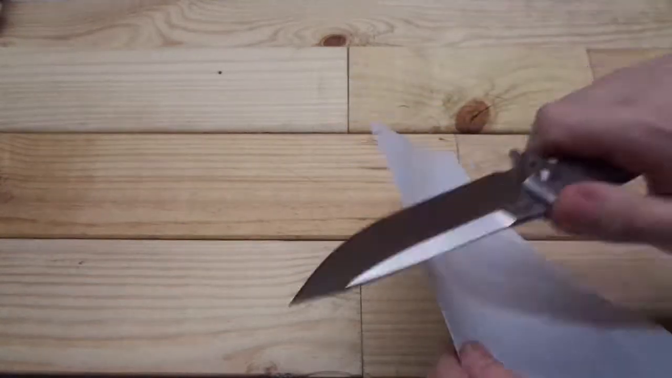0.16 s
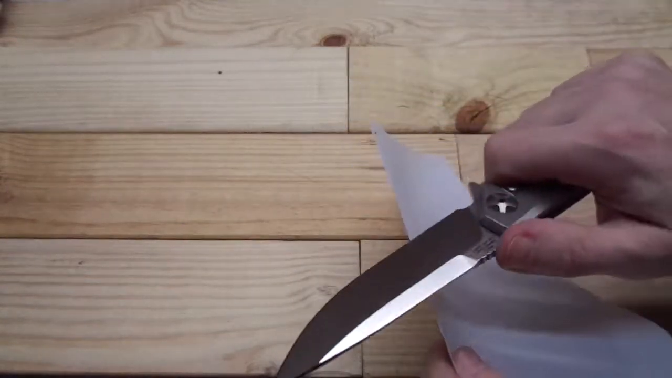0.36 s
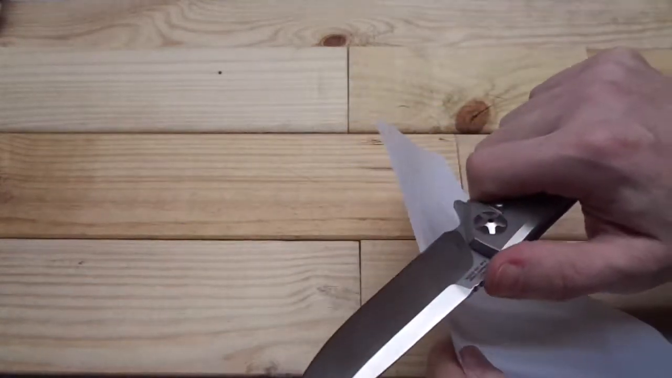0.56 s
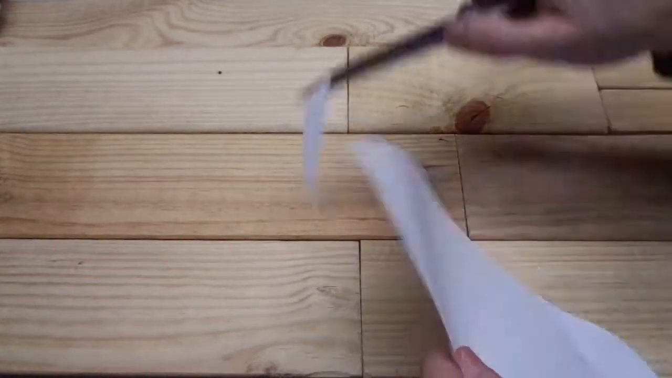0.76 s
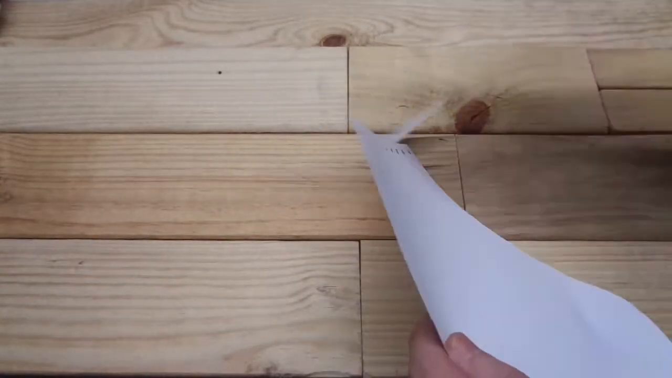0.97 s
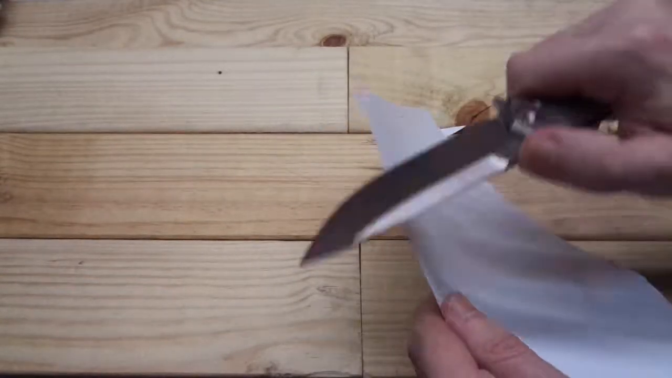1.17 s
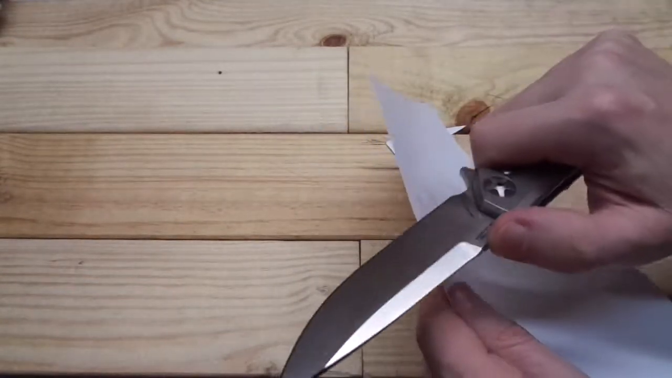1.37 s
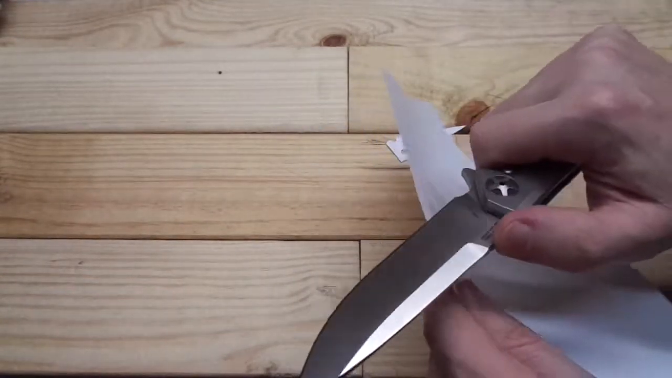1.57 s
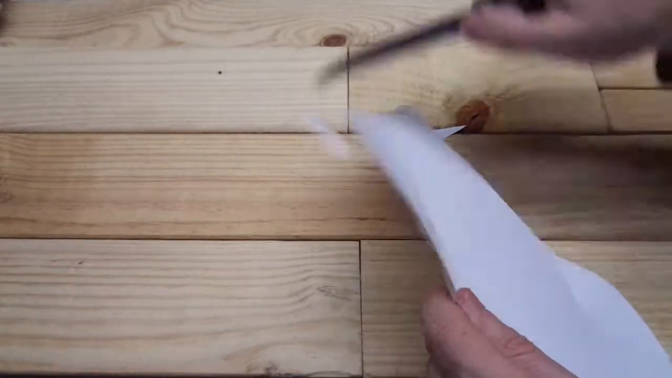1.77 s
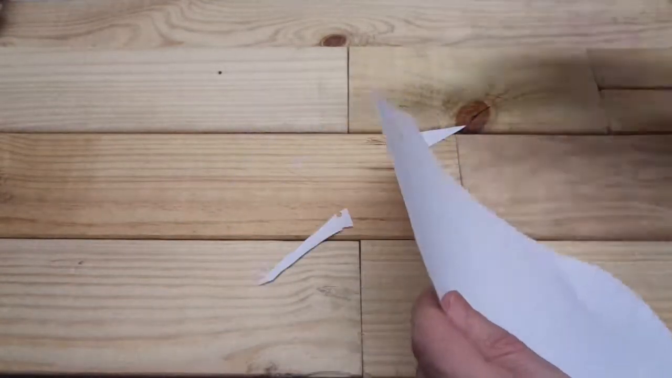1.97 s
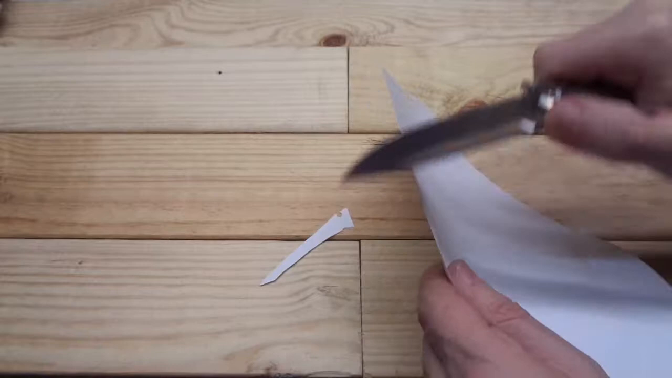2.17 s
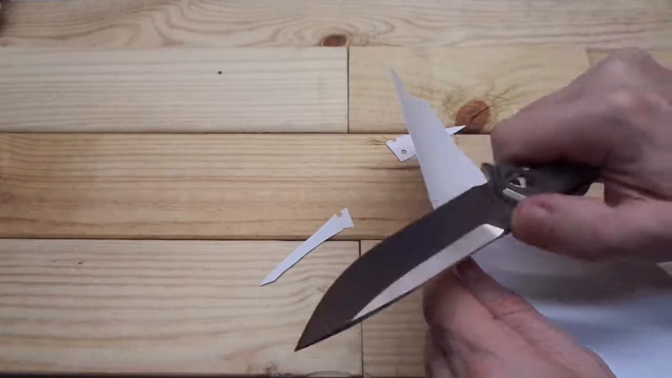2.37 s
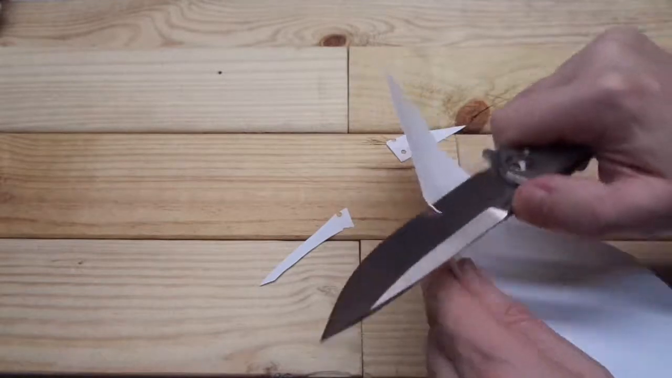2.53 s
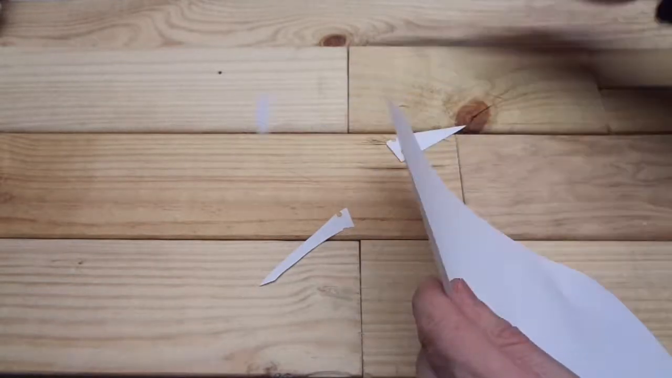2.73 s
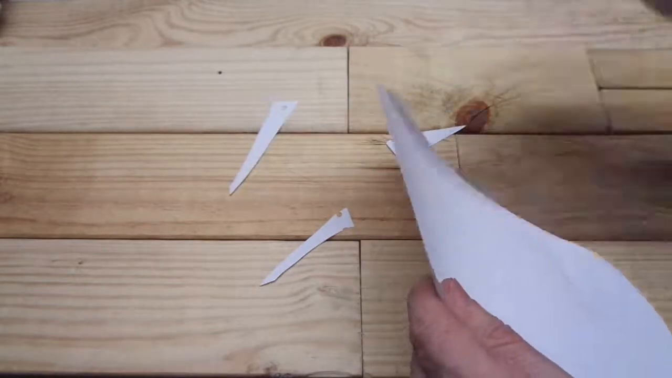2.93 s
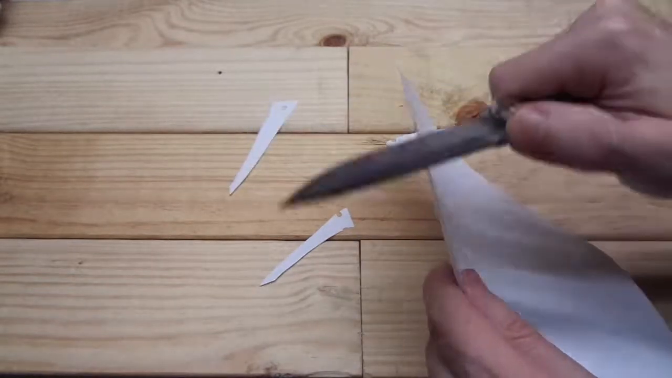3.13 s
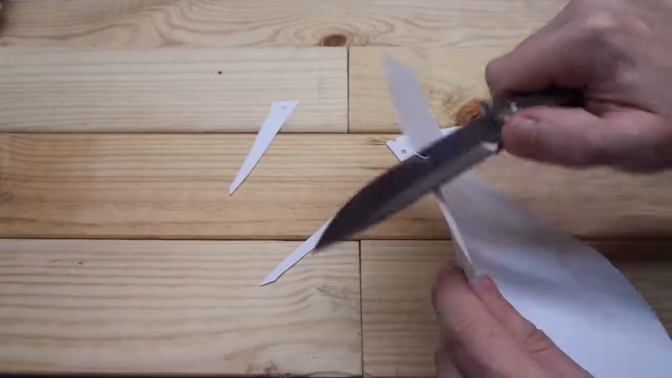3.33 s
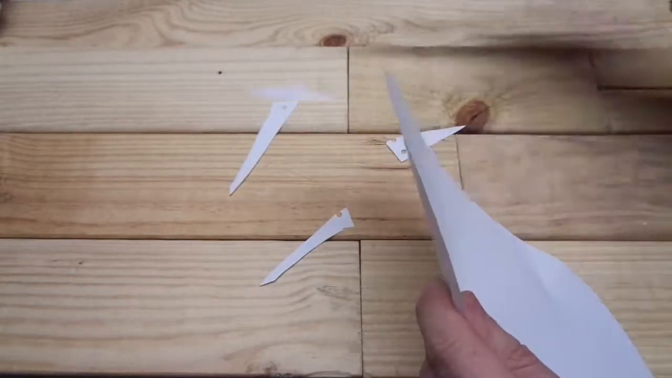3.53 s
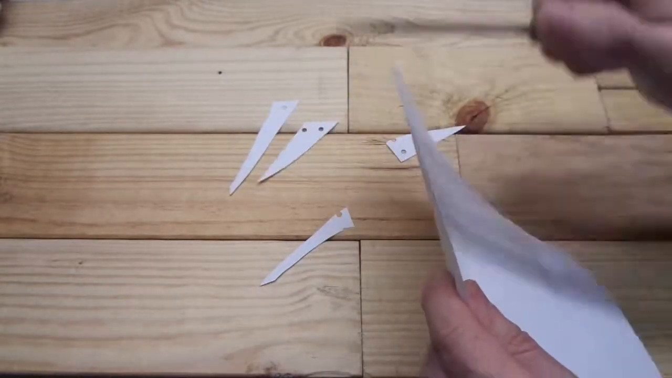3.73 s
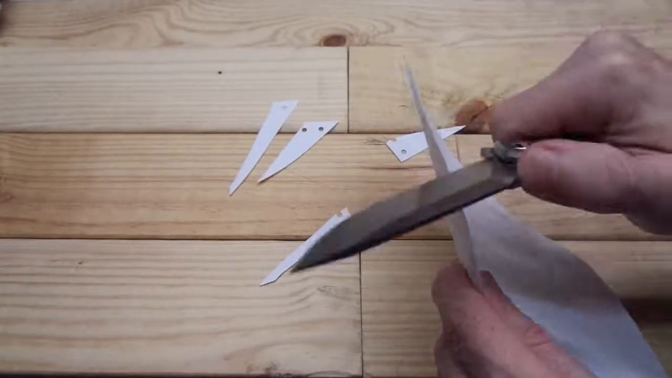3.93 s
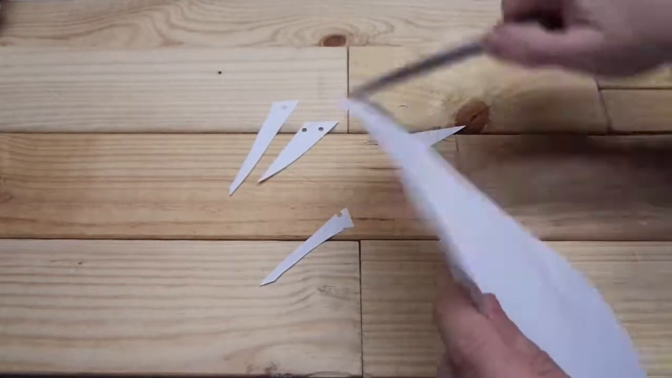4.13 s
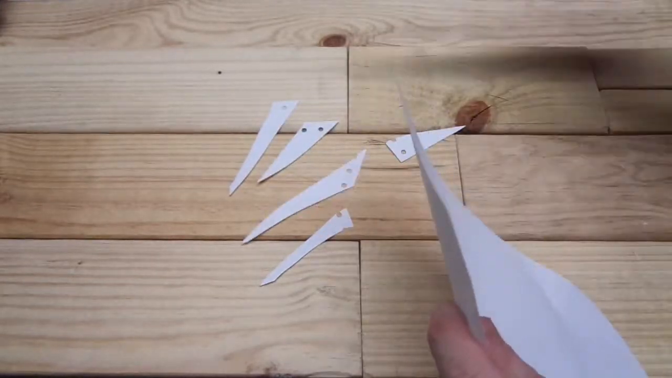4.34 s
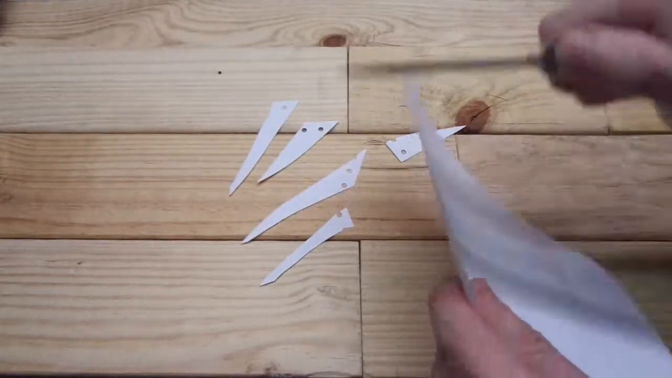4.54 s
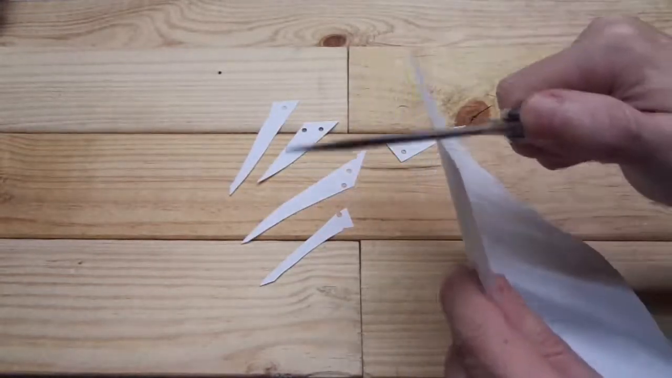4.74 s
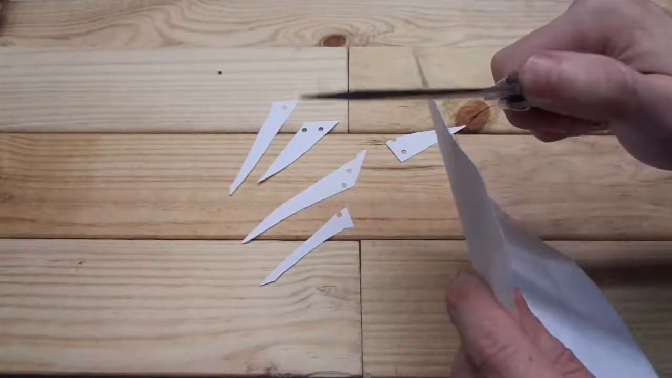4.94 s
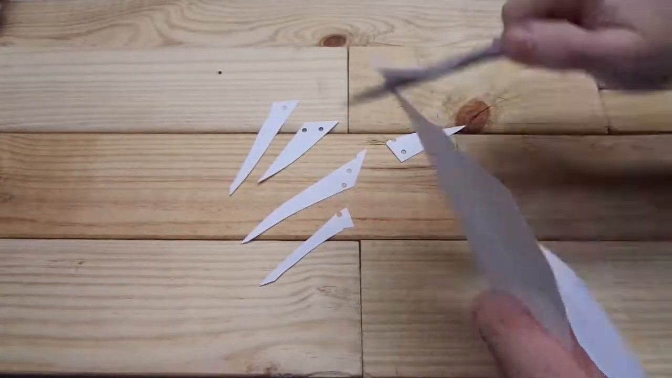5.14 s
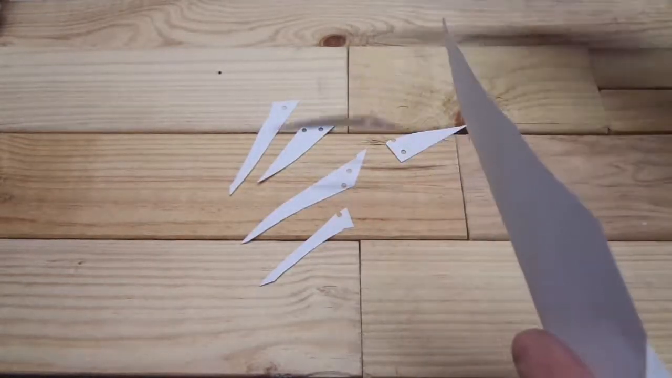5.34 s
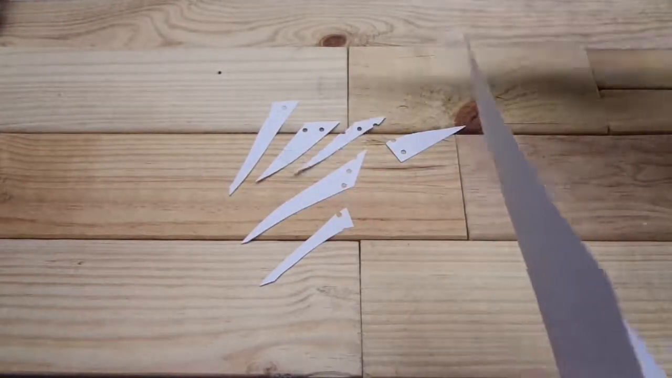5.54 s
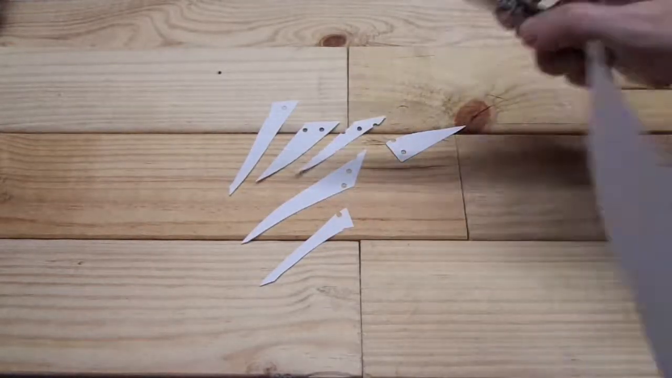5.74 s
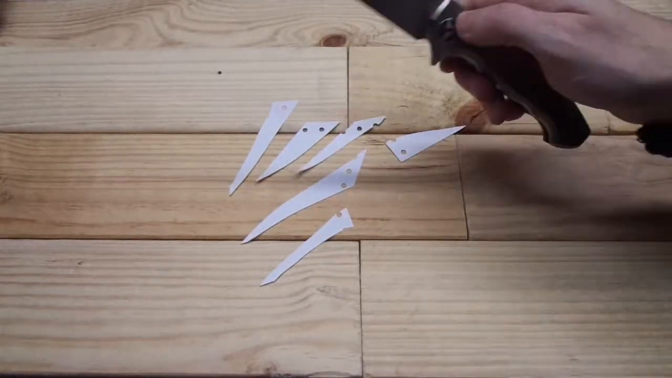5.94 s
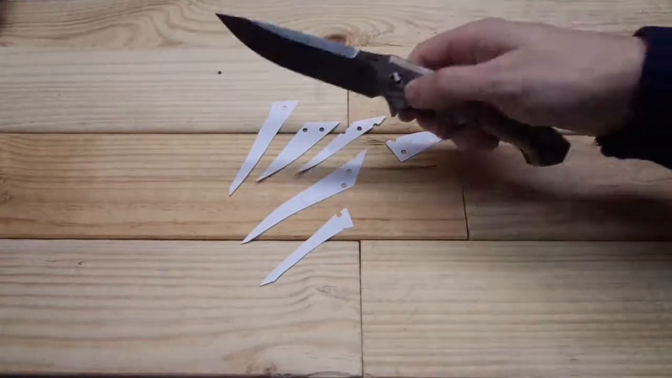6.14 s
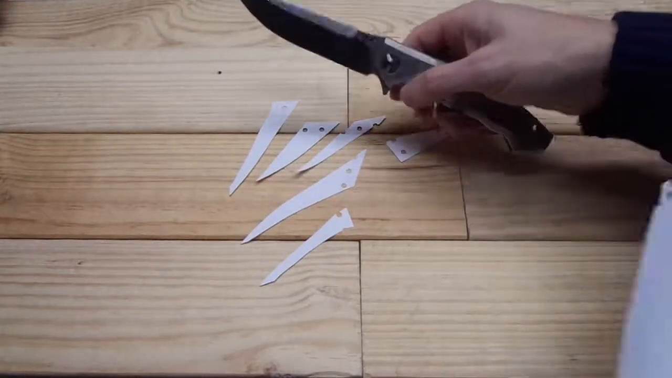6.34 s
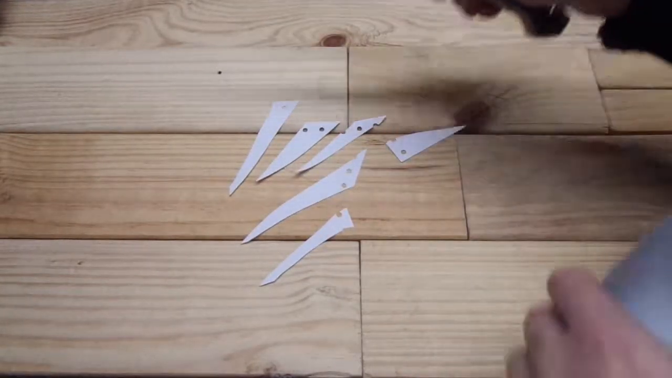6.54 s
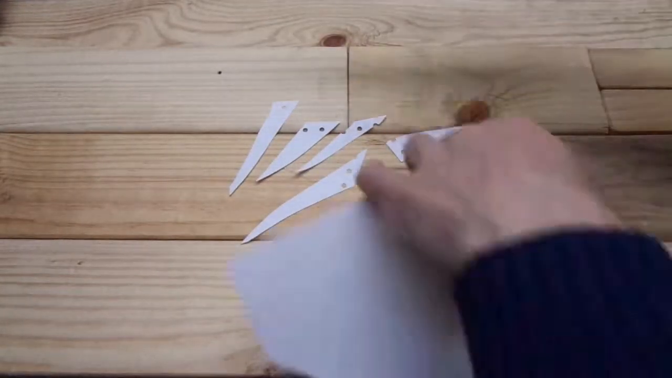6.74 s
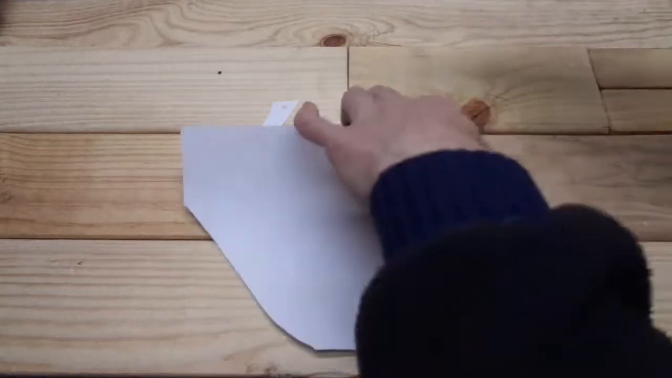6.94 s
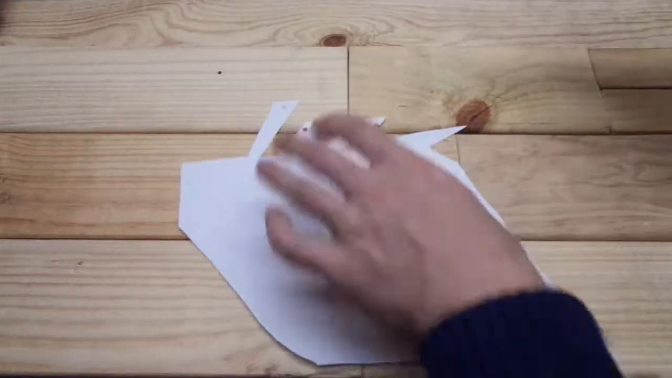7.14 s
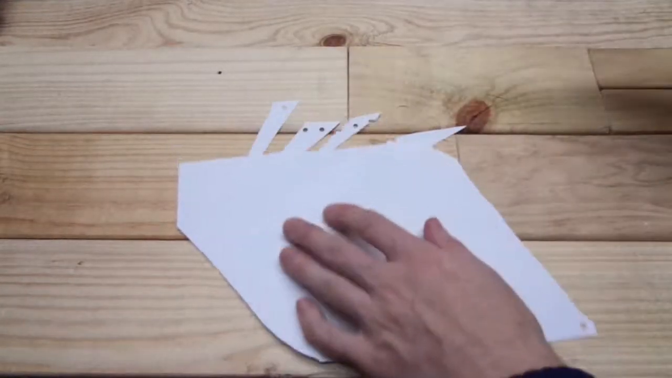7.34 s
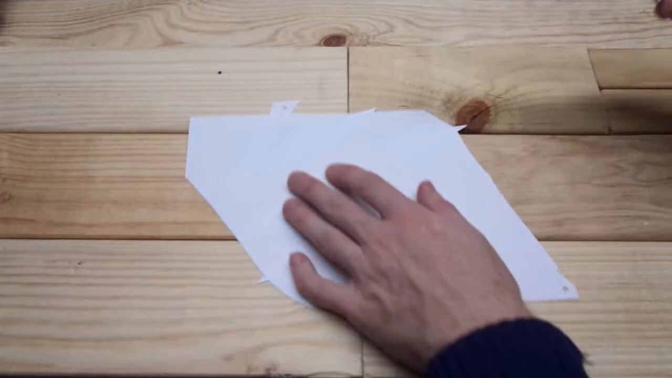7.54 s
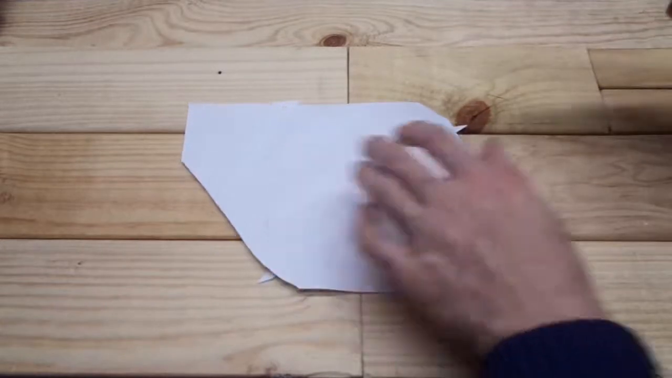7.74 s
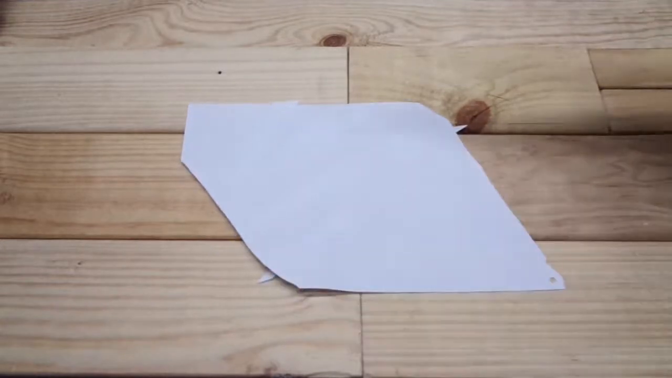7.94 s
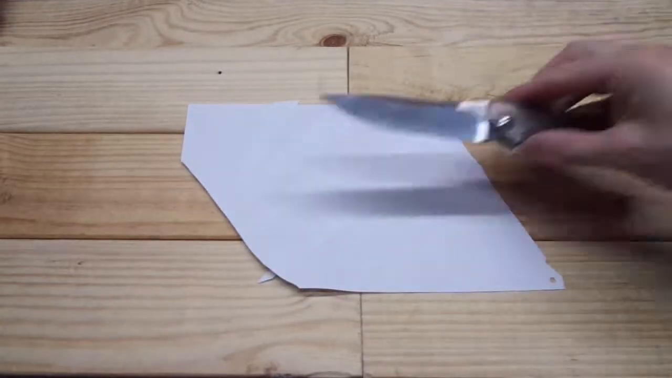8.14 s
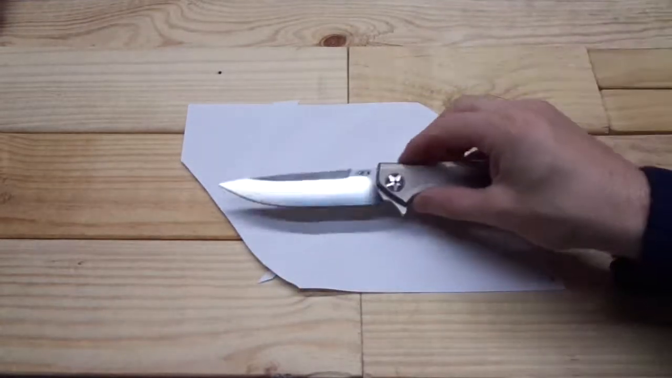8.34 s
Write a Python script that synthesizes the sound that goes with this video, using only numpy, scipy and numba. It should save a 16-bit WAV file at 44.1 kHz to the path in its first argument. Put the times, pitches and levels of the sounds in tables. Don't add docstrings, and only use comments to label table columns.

```python
import sys
import numpy as np
from scipy import signal
from scipy.fft import rfft, irfft
from scipy.io import wavfile
from scipy.ndimage import uniform_filter1d
from numba import njit

SR = 44100
rng = np.random.default_rng(int(sys.argv[2]) if len(sys.argv) > 2 else 0)


def invert_db(level):
    return 10 ** (np.asarray(level, dtype=float) / 20)


def transcribe(u):
    v = np.clip(np.atleast_2d(u).T, -1, 1)
    q = np.round(v * 32767).astype(np.int16)
    wavfile.write(sys.argv[1], SR, q)


N = 370440

# f/Hz, density/dB per Hz
HISS_SPECTRUM = [(12, -37), (20, -5), (32, -34), (54, -8), (298, -5.5), (491, -3.5), (580, -5), (931, -5),
                 (1160, -10.5), (1340, -7), (1720, -7), (1870, -10), (5230, -17.5), (14200, -18.5),
                 (15500, -17)]
# f/Hz, width/Hz, rms/dB
FAN_TONES = [(1170, 110, -59.5), (1757, 43, -75.5), (290, 24, -74.5)]
# t/s, rise/s, fall/s, peak/dB
CREAKS = [
    (2.11, 0.056, 0.11, -50),
    (7.785, 0.026, 0.11, -43),
]
# f/Hz, width/Hz, level/dB
BOARD_MODES = [
    [(500, 33, 2), (640, 36, 4), (990, 29, 8), (1090, 23, 0), (1560, 30, -8), (2060, 33, -13),
     (3530, 73, -28), (7130, 34, -15), (8300, 30, -11), (8610, 46, -17)],
    [(540, 110, -0.5), (854, 30, 5), (1370, 17, -2), (1590, 45, -0.5), (2200, 31, -5), (2570, 18, -20),
     (2570, 38, -26), (4340, 39, -30)],
]
# t/s, peak/dB, f/Hz
THUDS = [(0.735, -44, 110), (4.15, -47, 120), (1.84, -53, 131), (0.739, -35, 364), (1.815, -35.5, 396),
         (1.936, -42, 365), (2.714, -37, 315), (3.528, -42.5, 268), (4.159, -35, 333), (4.264, -44, 480),
         (5.249, -51, 302), (6.08, -46, 473), (6.317, -40, 313), (6.442, -44.5, 252), (7.594, -45.5, 374),
         (7.797, -41, 474)]

# t/s, peak/dB, ring f/Hz, presence/dB, T60/s
FLAPS = [(0.746, -27, 1570, -23, 0.12), (0.759, -14.5, 1430, -1, 0.079), (0.789, -21.5, 1140, -23, 0.11),
         (1.782, -19, 1300, -2, 0.049), (1.879, -26, 1100, -9, 0.06), (1.943, -27, 1060, -22, 0.05),
         (1.968, -34.5, 1090, -2.5, 0.092), (2.763, -39, 1270, -18, 0.08), (3.384, -19.5, 1240, -20, 0.11),
         (3.454, -18, 3260, -12, 0.028), (3.496, -27, 960, -8, 0.27), (3.528, -24, 1290, -19, 0.058),
         (5.176, -13, 890, 0, 0.069), (5.181, -21, 2270, -1, 0.06), (5.217, -27, 1540, -4, 0.2),
         (6.6, -34.5, 1230, -2, 0.44)]
# t/s, peak/dB, ring f/Hz, presence/dB
TAPS = [(0.12, -23.5, 1310, -20), (1.625, -35, 1500, -8), (5.043, -34.5, 1290, -12),
        (1.076, -35.5, 940, -6), (1.114, -30.5, 990, -16), (1.174, -41.5, 1230, -3),
        (1.574, -43, 1560, -18), (2.457, -39, 1760, -7), (4.572, -38.5, 990, -22), (4.588, -29.5, 860, -26),
        (4.869, -31, 904, -32), (6.079, -40, 890, -14), (6.082, -24.5, 820, -19), (6.523, -36, 1490, -21),
        (6.569, -37.5, 1500, -21), (6.883, -32.5, 2400, -20), (6.983, -30, 1500, -10),
        (7.312, -39.5, 1140, -28)]
# t/s, peak/dB, ring f/Hz, presence/dB, treble/dB
TICKS = [(0.603, -39, 1310, -6, -15), (0.626, -40, 1550, -5, -15), (0.934, -36.5, 1230, -3, -11.5),
         (0.995, -46, 2000, -4, -14), (1.04, -47, 1730, -12, -6.5), (2.868, -48.5, 1170, 7, -3),
         (3.638, -36, 2070, -1, -6), (4.155, -27, 880, 3, -12), (5.413, -37, 3300, 2.5, -9.5),
         (5.663, -38, 1280, -11, -18), (5.722, -42.5, 1490, -3, -10), (6.015, -45, 1150, 6, -6),
         (6.317, -35, 1370, -8, -28), (6.686, -35, 2070, -8, -18), (6.228, -42, 2500, -6, -20),
         (6.767, -49, 3330, -5, -15), (6.791, -50, 3300, -19, -3), (6.826, -31.5, 940, -9, -23),
         (6.934, -19, 3200, 2, -22), (2.846, -56, 1200, -10, -14), (7.586, -38, 3600, 0, -5),
         (7.596, -33, 3300, 0, -5), (7.601, -29, 3170, 0, -9), (7.611, -30, 3400, -2, -9),
         (7.606, -30, 3220, -5, -4), (7.616, -28.5, 3240, -6, -7), (7.803, -52, 850, -13, -23)]
# t/s, peak/dB, ring f/Hz, presence/dB, T60/s
RIPS = [(0.578, -39, 990, -9, 0.094), (0.676, -29, 1030, -15, 0.13), (1.815, -18.5, 1390, -7, 0.12),
        (6.435, -36.5, 1660, -15, 0.065), (6.455, -31.5, 1310, -13, 0.063), (6.714, -36, 1690, -2, 0.093),
        (7.011, -32, 3400, -8, 0.043), (2.711, -21.5, 1380, 0, 0.094), (0.804, -24.5, 1250, -20, 0.074),
        (1.773, -26, 1200, 0, 0.15), (1.878, -24.5, 1140, -11, 0.053), (4.181, -25.5, 920, 3.5, 0.07),
        (4.263, -26.5, 1020, -8, 0.064)]
# t/s, length/s, level/dB,
# centre f/Hz, width/Hz
BRUSHES = [(6.569, .014, -45, 1600, 900), (6.602, 0.077, -47, 1260, 500), (6.657, .04, -56, 7500, 6000),
           (6.687, .014, -45.5, 5800, 2500), (6.72, .022, -46.5, 10200, 3500),
           (6.72, 0.02, -47.5, 2800, 700), (6.766, 0.037, -52.5, 3360, 350), (6.792, .028, -49, 9400, 3000),
           (6.828, .03, -52, 10400, 5000), (6.887, 0.059, -49, 8500, 7000), (6.89, 0.037, -50, 3100, 1200),
           (7.008, 0.02, -43.5, 3640, 900), (7.011, 0.016, -40, 2400, 500), (6.206, 0.2, -60.5, 5500, 4000),
           (7.453, 0.097, -56.5, 3550, 1600), (7.46, 0.064, -60, 1230, 250),
           (7.793, 0.043, -66, 4200, 1200), (3.328, 0.12, -44, 6000, 2500), (0.65, .03, -48, 8000, 6000),
           (5.216, .012, -38, 3380, 900), (6.936, .022, -37, 3500, 1800), (4.15, .016, -29, 900, 400),
           (4.152, .016, -31, 3000, 2500), (4.267, .009, -52, 9500, 6000), (2.495, .06, -41, 2300, 1500),
           (2.718, .03, -35, 1100, 700), (2.755, .03, -42, 950, 500), (3.44, .045, -37, 850, 400),
           (3.308, .02, -50, 3500, 4000), (3.632, .014, -52, 2000, 2500), (4.183, .016, -35, 2200, 2000),
           (7.309, .008, -46, 1170, 300), (2.14, .085, -55, 520, 160), (0.744, .03, -32, 1100, 500),
           (1.818, .022, -33, 2300, 2200), (4.534, .012, -52, 850, 400), (4.587, .006, -50, 3800, 3000),
           (2.15, .07, -60, 2200, 900), (4.012, .015, -48, 1300, 900), (6.936, .015, -42, 1300, 700),
           (7.797, .03, -58, 6000, 6000), (0.12, .006, -46, 3800, 2500)]
# t/s, length/s, level/dB,
# start f/Hz, end f/Hz
GLIDES = [(0.71, .035, -31.5, 3400, 4400), (0.715, 0.034, -34, 5100, 6100), (0.675, 0.02, -30, 1580, 850),
          (1.725, 0.046, -35, 9100, 8200), (1.73, 0.03, -35.5, 3860, 5100), (5.12, .065, -36.5, 7240, 7700),
          (5.085, 0.037, -42.5, 2500, 2580), (7.798, .045, -52.5, 2900, 2120), (1.7, .03, -55, 1150, 1150),
          (2.155, 0.045, -48, 1640, 1530), (6.082, 0.011, -36, 1530, 1680), (2.597, .035, -36, 9800, 10100),
          (2.6, .057, -35, 2350, 2700), (2.635, .04, -39, 9100, 10000), (2.664, .014, -38, 12700, 12900),
          (2.635, .03, -37, 4400, 4800), (4.128, .022, -31, 3600, 3800), (4.1, .03, -38, 6800, 7000),
          (3.38, .04, -39, 11500, 11300), (2.15, .095, -55, 1060, 990), (7.805, .085, -56, 860, 840)]

# t/s, effort/dB, rubbing over flexing/dB
HANDLING = [(5.6, -70, 1), (5.95, -70.5, 1), (6.14, -62, 0), (6.24, -57.5, -5.5), (6.38, -60, -6),
            (6.44, -58.5, -16), (6.58, -54, -7), (6.64, -50, -5.5), (6.76, -55, -0.5), (6.87, -58, -1),
            (6.93, -54, 0.5), (7.02, -52, 0), (7.06, -60, -1)]
# t/s, level/dB, fall/dB per s
SHIVERS = [
    (0.001, -56.5, 80),
    (0.761, -28.5, 328),
    (1.775, -27.5, 400),
    (2.709, -30.5, 265),
    (3.446, -29, 247),
    (4.165, -36.5, 197),
    (5.19, -37.5, 170),
]
# t/s, level/dB
SLIDE_LEVEL = [(7.3, -78), (7.328, -52), (7.395, -46), (7.425, -48), (7.544, -42.5), (7.578, -46.5),
               (7.613, -39), (7.655, -50), (7.72, -79)]
# f/Hz, density/dB per Hz
SLIDE_SPECTRUM = [(400, -24), (1180, -1), (2290, -10.5), (3720, -4.5), (4330, -4.5), (11300, -3.5),
                  (14400, -11), (15200, -13)]

# t/s, pressure/dB, strip resonance f/Hz
CUTS = [
    [(0.62, -67, 2650), (0.678, -38, 2900), (0.726, -34, 3530), (0.746, -31.5, 3460), (0.79, -61, 2650)],
    [(1.585, -72, 2710), (1.647, -44, 2570), (1.749, -33.5, 2580), (1.777, -32, 2890), (1.795, -45.5, 2950),
     (1.82, -54, 2770)],
    [(2.47, -65, 2690), (2.512, -43, 2680), (2.562, -42, 2990), (2.624, -31.5, 2670), (2.674, -35.5, 3010),
     (2.692, -47, 3100), (2.71, -53, 2860)],
    [(3.295, -70, 2680), (3.327, -44.5, 2760), (3.401, -31, 2970), (3.437, -34.5, 3180), (3.463, -47, 3100),
     (3.49, -56, 2870)],
    [(4.0, -74, 2800), (4.022, -55.5, 2830), (4.066, -34.5, 2880), (4.106, -30, 3040), (4.136, -32.5, 3520),
     (4.154, -31.5, 3500), (4.205, -51.5, 2890)],
    [(5.03, -80, 2540), (5.046, -56, 2750), (5.076, -44.5, 2570), (5.138, -32.5, 3140), (5.18, -33.5, 3030),
     (5.208, -52, 2930), (5.23, -50, 3040)],
]
# body/dB, strip/dB
GRIP_CEILINGS = [(-35, -31), (-43, -38.5), (-37.5, -33), (-38.5, -32.5), (-37.5, -35.5), (-37, -28)]
# f/Hz, width/Hz, level/dB
TAUT_MODES = [
    [(960, 39, 7), (1560, 80, -3), (4300, 39, -10), (5200, 45, -1), (5800, 160, -3), (7660, 57, 5)],
    [(1570, 36, 4), (2500, 130, 7), (4700, 80, -18), (5000, 73, -20), (8900, 88, -2), (9700, 79, -15)],
    [(2400, 98, 0.5), (4470, 140, -12), (4970, 110, -7), (9150, 71, -2), (10000, 46, -6), (12700, 46, -12)],
    [(1200, 170, -2.5), (2990, 40, -17), (3460, 62, -16), (8200, 140, -17), (9200, 44, -20),
     (11350, 52, -3)],
    [(2400, 20, -2), (3700, 40, -6), (4660, 30, -3), (6900, 56, -3), (8500, 260, -9), (11400, 78, -7)],
    [(2940, 26, -14), (4600, 37, -9), (6840, 110, -5), (7730, 110, -3), (10500, 37, -1), (11000, 44, -3)],
]
# f/Hz, density/dB per Hz
BODY_SPECTRUM = [(35, -76), (60, -34), (226, -16.5), (260, -15.5), (324, -10.5), (362, -10), (489, -14),
                 (904, 0.5), (1990, -1.5), (2600, -13.5), (3380, -33), (5720, -120)]
# f/Hz, density/dB per Hz
STRIP_SPECTRUM = [(1600, -83), (2200, 2.5), (3000, 10.5), (4500, 5.5), (5500, -10), (7000, -17)]
# f/Hz, density/dB per Hz
FIBRE_SPECTRUM = [(4200, -4.5), (5500, 0), (7000, 0), (9000, -0.5), (12000, -3), (14000, -2), (16000, -18)]

HISS_RMS_DB = -55.5
CREAK_EDGE_DB = -17.5
ROOM_T60_S, ROOM_DB, ROOM_CUT_HZ = 0.34, -16.5, 7600
FLAP_TREBLE_DB, TAP_TREBLE_DB, RIP_TREBLE_DB = -37, -36, -31.5
TAP_T60_S, TICK_T60_S, RIP_RISE_S = 0.1, 0.056, 0.0058
BODY_FADES_HZ = 1500
GLIDE_WIDTH_SHARE = 0.07
BRUSH_EDGE_SHARE = 0.21
SHIVER_STRIP_DB, SHIVER_HISS_DB = -8, -37
LET_GO_S = 0.036
BODY_LEAD_DB, STRIP_LEAD_DB = 5, 3
SIDE_DB, SIDE_HISS_DB = -39, -37
DC_OFFSET, CUTOFF_HZ = -0.0006, 15050


def rms_one(x):
    return x / np.sqrt(np.mean(x ** 2) + 1e-20)


def coloured(x, spectrum):
    hz, level_db = np.transpose(spectrum)
    bins_hz = np.maximum(np.arange(N // 2 + 1) * SR / N, 1)
    gain_db = np.interp(np.log(bins_hz), np.log(hz), level_db)
    return rms_one(irfft(rfft(x) * invert_db(gain_db), N))


def levels_db(tables):
    t, level_db = np.arange(N) / SR, np.full(N, -140.0)
    for rows in map(np.array, tables):
        inside = slice(int(rows[0, 0] * SR), int(rows[-1, 0] * SR))
        level_db[inside] = np.interp(t[inside], rows[:, 0], rows[:, 1])
    return level_db


def gains(level_db):
    return uniform_filter1d(invert_db(level_db), size=220)


def drift(rate_hz):
    hop, settle = 30, 1500
    r = np.exp(-2 * np.pi * rate_hz * hop / SR)
    draws = rng.standard_normal(N // hop + settle + 2)
    slow = signal.lfilter([1], [1, -2 * r, r * r], draws)[settle:]
    return np.interp(np.arange(N) / hop, np.arange(len(slow)), rms_one(slow))


def grains(per_s, spread_db):
    sizes = invert_db(spread_db * np.minimum(rng.exponential(1, N), 5))
    signs = rng.choice([-1, 1], N)
    return sizes * signs * (rng.random(N) < per_s / SR)


@njit
def resonate(x, hz, width_hz, sr):
    out, r = np.zeros(len(x)), np.exp(-np.pi * width_hz / sr)
    for i in range(2, len(x)):
        drive = (1 - r * r) / 2 * (x[i] - x[i - 2])
        turn = 2 * r * np.cos(2 * np.pi * hz[i] / sr)
        out[i] = drive + turn * out[i - 1] - r * r * out[i - 2]
    return out


def ringing(x, hz, width_hz):
    return rms_one(resonate(x, hz + np.zeros(len(x)), width_hz, SR))


def bandpass(x, order, edges_hz):
    return signal.sosfilt(signal.butter(order, edges_hz, "band", fs=SR, output="sos"), x)


def background():
    air = rng.standard_normal(N)
    fan = sum(invert_db(level_db) * ringing(air, hz, width_hz) for hz, width_hz, level_db in FAN_TONES)
    hiss = coloured(rng.standard_normal(N), HISS_SPECTRUM)
    return invert_db(HISS_RMS_DB) * hiss + fan * invert_db(0.5 * drift(7.0))


def room(x):
    t = np.arange(SR // 2) / SR
    tail = rng.standard_normal(len(t)) * invert_db(-60 * t / ROOM_T60_S) * (t > 0.004)
    tail = bandpass(tail, 1, [300, ROOM_CUT_HZ])
    tail = tail / np.sqrt(np.sum(tail ** 2))
    return invert_db(ROOM_DB) * signal.fftconvolve(x, tail)[:N]


def creaks():
    out = np.zeros(N)
    slips = grains(1500, spread_db=2.5)
    for (s, rise_s, fall_s, peak_db), modes in zip(CREAKS, BOARD_MODES):
        wood = np.zeros(N)
        for hz, width_hz, level_db in modes:
            waver = invert_db(level_db + 2.0 * drift(30))
            wood += waver * ringing(slips, hz + 15 * drift(2.8), 2 * width_hz)
        edge_db = peak_db + CREAK_EDGE_DB
        swell = [(s, edge_db), (s + rise_s, peak_db), (s + rise_s + fall_s, edge_db)]
        out += rms_one(wood) * gains(levels_db([swell]))
    return out


def thuds():
    out, t = np.zeros(N + SR), np.arange(SR // 4) / SR
    for s, peak_db, hz in THUDS:
        puff = rng.standard_normal(len(t)) * invert_db(-60 * t / 0.22)
        knock = ringing(ringing(puff, hz, 1.2 * hz), hz, 1.2 * hz)
        start = round(s * SR)
        out[start:start + len(t)] += invert_db(peak_db) * knock / np.abs(knock).max()
    return out[:N]


def brushes():
    out = np.zeros(N)
    rows = [(s, long_s, db, hz, hz, width_hz) for s, long_s, db, hz, width_hz in BRUSHES]
    rows += [(*row, GLIDE_WIDTH_SHARE * row[3]) for row in GLIDES]
    spray = grains(14000, spread_db=2.0)
    for s, long_s, level_db, from_hz, to_hz, width_hz in rows:
        share = np.arange(round(long_s * SR)) / (long_s * SR)
        shape = np.minimum(np.minimum(2 * share, 1 - share) / BRUSH_EDGE_SHARE, 1)
        start = round(s * SR)
        span = slice(start, start + len(share))
        pitch_hz = from_hz + (to_hz - from_hz) * share
        once = ringing(spray[span], pitch_hz, 1.3 * width_hz)
        out[span] += invert_db(level_db) * shape * ringing(once, pitch_hz, 1.3 * width_hz)
    return out


def all_snaps():
    flaps = [(*row[:4], FLAP_TREBLE_DB, row[4], 0) for row in FLAPS]
    taps = [(*row, TAP_TREBLE_DB, TAP_T60_S, 0) for row in TAPS]
    ticks = [(*row, TICK_T60_S, 0) for row in TICKS]
    rips = [(*row[:4], RIP_TREBLE_DB, row[4], RIP_RISE_S) for row in RIPS]
    return sorted(flaps + taps + ticks + rips)


def snaps():
    out, t = np.zeros(N + SR), np.arange(SR // 4) / SR
    for s, peak_db, hz, presence_db, treble_db, t60_s, rise_s in all_snaps():
        noise = rng.standard_normal((2, len(t)))
        fade_db = -60 * t / np.clip(t60_s, 0.005, 0.4)
        crackle = noise[0] * np.abs(noise[1]) * invert_db(fade_db)
        if rise_s:
            drive = crackle * np.minimum(t / rise_s, 1) ** 2
        else:
            burst = 1 + 1.2 * invert_db(-60 * t / 0.025)
            drive = crackle * burst + 8.5 * (t == 0)
        ring = ringing(drive, hz, 0.16 * hz * max(1, hz / BODY_FADES_HZ))
        ring = ringing(ring, hz, 0.45 * hz)
        body = rms_one(bandpass(drive * invert_db(0.4 * fade_db), 3, [650, 2500]))
        low = 0.95 * ring + 0.75 * min(1, BODY_FADES_HZ / hz) ** 2 * body
        presence = bandpass(drive * invert_db(2.1 * fade_db), 3, [2500, 5500])
        treble = bandpass(drive * invert_db(0.28 * fade_db), 3, [5500, 12500])
        start = round(s * SR)
        for share_db, x in ((0, low), (presence_db - 0.5, presence), (treble_db + 10.0, treble)):
            out[start:start + len(t)] += invert_db(peak_db + share_db) * x / np.abs(x).max()
    return out[:N]


def patchy(x, patchy_db):
    edges_hz = np.geomspace(4000, 16500, 5)
    out = np.zeros(N)
    for k, pair in enumerate(zip(edges_hz, edges_hz[1:])):
        sign = (-1) ** k
        out += sign * bandpass(x, 2, pair) * invert_db(patchy_db * drift(12.6))
    return rms_one(out)


def sheet(body_gain, strip_gain, hiss_gain, breaks, flutter_db, strip_ring):
    body = body_gain * coloured(breaks, BODY_SPECTRUM) * invert_db(flutter_db * drift(78))
    strip = rms_one(coloured(breaks, STRIP_SPECTRUM) + strip_ring)
    strip = strip_gain * strip * invert_db(flutter_db * drift(73))
    rubbed = breaks + 1.3 * rng.standard_normal(N)
    hiss = hiss_gain * patchy(coloured(rubbed, FIBRE_SPECTRUM), patchy_db=2.5)
    return (body + strip + hiss) * invert_db(0.67 * flutter_db * drift(20.0))


def handling():
    shiver = gains(levels_db([[(s, db), (s + 50 / fall, db - 53.5)] for s, db, fall in SHIVERS]))
    s, _, rub_db = np.transpose(HANDLING)
    rub_db = np.interp(np.arange(N) / SR, s, rub_db)
    effort = gains(levels_db([HANDLING]))
    body = shiver + effort * invert_db(-0.42 * rub_db - 2.5)
    strip = shiver * invert_db(SHIVER_STRIP_DB) + effort * invert_db(0.41 * rub_db + 0.5)
    hiss = shiver * invert_db(SHIVER_HISS_DB) + effort * invert_db(rub_db)
    clumps = grains(1500 * invert_db(6.5 * drift(30)), spread_db=3.0)
    clumps = rms_one(clumps + 0.31 * rng.standard_normal(N))
    slide = coloured(grains(15000, spread_db=3.0), SLIDE_SPECTRUM) * invert_db(0.85 * drift(40))
    slide = slide * gains(levels_db([SLIDE_LEVEL]))
    return sheet(body, strip, hiss, clumps, flutter_db=1.7, strip_ring=0) + slide


def bending(breaks, pull):
    out = np.zeros(N)
    for cut, modes in zip(CUTS, TAUT_MODES):
        span = slice(int(cut[0][0] * SR), int(cut[-1][0] * SR))
        for hz, width_hz, level_db in modes:
            waver = invert_db(level_db - 12.5 + 3.5 * drift(16)[span]) * np.sqrt(width_hz / 150)
            pitch_hz = hz * (1 + 0.02 * drift(8)[span])
            out[span] += waver * ringing(breaks[span], pitch_hz, 2 * width_hz)
    return out * pull


def cuts():
    t, rows = np.arange(N) / SR, np.vstack(CUTS)
    released = [[*cut, (cut[-1][0] + LET_GO_S, cut[-1][1] - 20, 0)] for cut in CUTS]
    hiss = gains(levels_db(released))
    which = np.maximum(np.searchsorted([cut[0][0] for cut in CUTS], t) - 1, 0)
    body_max_db, strip_max_db = np.transpose(GRIP_CEILINGS)
    body = 1 / np.hypot(1 / (hiss * invert_db(BODY_LEAD_DB)), invert_db(-body_max_db[which]))
    strip = 1 / np.hypot(1 / (hiss * invert_db(STRIP_LEAD_DB)), invert_db(-strip_max_db[which]))
    breaks = rms_one(grains(11000, spread_db=2.2))
    strip_hz = np.interp(t, rows[:, 0], rows[:, 2])
    strip_ring = 0.21 * ringing(breaks, strip_hz, width_hz=730)
    sliced = sheet(body, strip, hiss, breaks, flutter_db=2.0, strip_ring=strip_ring)
    return sliced + bending(breaks, strip + hiss)


def scene():
    paper = cuts() + handling() + snaps() + thuds() + brushes()
    mono = paper + room(paper) + creaks() + background()
    return np.array([mono, mono])


def band_limit(x):
    return signal.sosfilt(signal.butter(12, 15640, fs=SR, output="sos"), x)


def record(dry):
    wobble = invert_db(SIDE_DB) * drift(200) + invert_db(SIDE_HISS_DB) * rng.standard_normal(N)
    wobble = wobble * invert_db(10 * drift(8.7))
    x = dry + dry[0] * wobble * np.array([[1], [-1]])
    top_cut = signal.ellip(12, 0.5, 80, CUTOFF_HZ, fs=SR, output="sos")
    mix = signal.sosfilt(top_cut, x) + DC_OFFSET
    return band_limit(mix)


dry = scene()
out = record(dry)
transcribe(out)
```